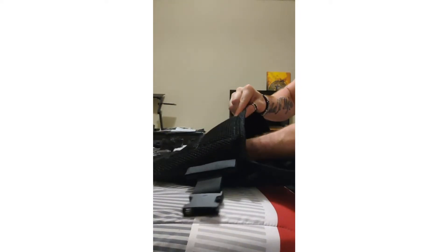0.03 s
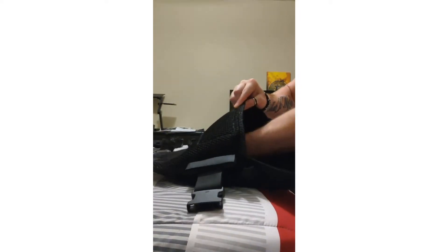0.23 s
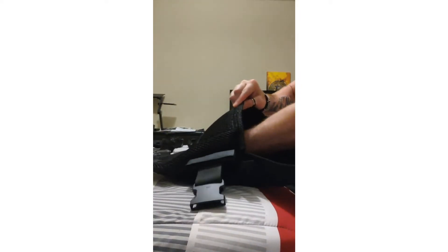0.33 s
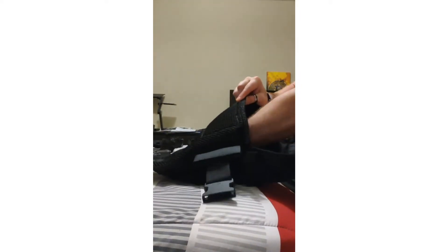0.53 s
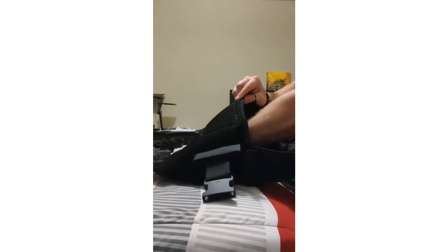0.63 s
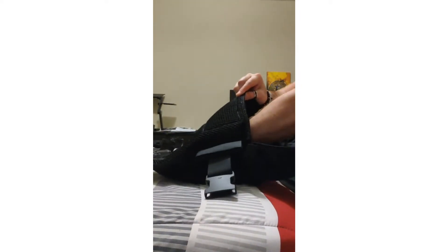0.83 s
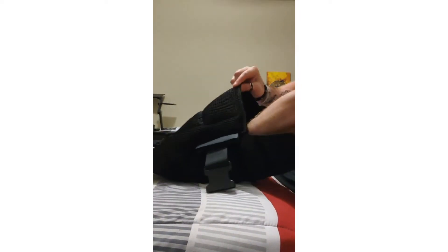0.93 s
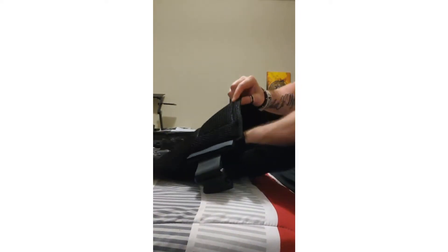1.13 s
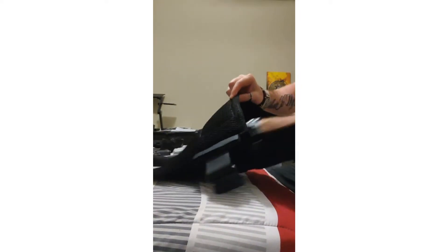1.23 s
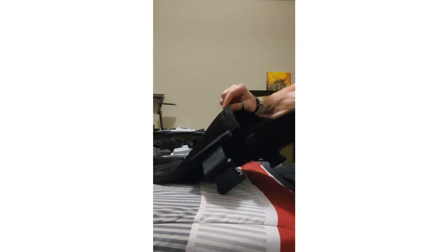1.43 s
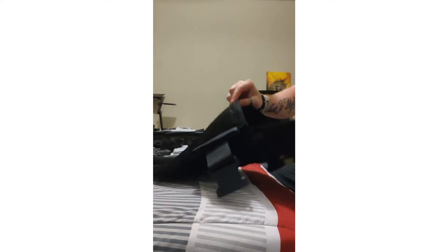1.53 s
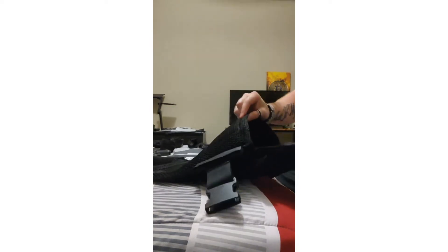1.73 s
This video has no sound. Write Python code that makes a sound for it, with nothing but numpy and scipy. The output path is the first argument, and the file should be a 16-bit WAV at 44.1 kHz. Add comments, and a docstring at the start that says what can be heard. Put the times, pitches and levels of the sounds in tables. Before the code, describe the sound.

Hook-and-loop fastener on a fabric bag is ripped open, close and dry indoors. Small pops at 0.05 and 0.15 s lead into a crackling rip from 0.2, strong at 0.35-0.5. A sharp jolt at 0.65 starts another loud tear until about 0.8; a third runs 0.97-1.17. After a lull, a weaker rip at 1.41, plastic buckle knocks near 1.53, then fading rustles over faint hum, rumble and hiss until 1.8.

```python
"""Hook-and-loop strap peeled open

A strap on a fabric bag is peeled in short pulls near a phone in a bedroom. Hooks snap free as filtered
random impulses; larger impulses jolt cloth and bag modes. Pops, rip jolts and a low thump are short
rings with ticks and rustling tails; a plastic buckle knocks near the end as rough contacts ringing
modes. Mains hum, low rumble, faint hiss.
"""
import sys
import numpy as np
from scipy import signal
from scipy.fft import rfft, irfft
from scipy.io import wavfile
from scipy.ndimage import uniform_filter1d

SR = 44100
rng = np.random.default_rng(int(sys.argv[2]) if len(sys.argv) > 2 else 0)


def dump(signal):
    """Clip the signal to [-1, 1] and save it as 16-bit WAV at the path in sys.argv[1]."""
    limited = np.clip(np.atleast_2d(signal).T, -1, 1)
    pcm = np.round(limited * 32767).astype(np.int16)
    wavfile.write(sys.argv[1], SR, pcm)


N = 79380

# peeling: t/s, hook level/dB, then re hooks: cloth jolts/dB, finest crackle/dB, duller rasp/dB, bag boom/dB
PEELING = [(0.0, -69, 11, -2, -6, 18), (0.034, -76, 17, -8, -1, 5), (0.064, -50, -7, -2, -2.5, -13),
           (0.134, -64.5, 6, -7, -2, 6), (0.16, -42.5, -13, 2, -7, -10.5), (0.174, -47.5, -17, -1, -11, -8),
           (0.194, -49.5, -7, 2, -3, -3), (0.204, -36, -19, -3, -7.5, -11), (.238, -39, -4, -0.5, -5.5, -3),
           (0.26, -35.5, -8.5, 1.5, -4.5, -9), (0.32, -32.5, -8, -4, -4.5, -5),
           (0.36, -26.5, -3, -2.5, -4.5, -9.5), (0.396, -29.5, 0, -0.5, 1, 0.5),
           (0.44, -25.5, -1.5, -3, -9, -10.5), (0.476, -32, -10, -7, -9, -8),
           (0.516, -41, -6.5, -5, -5, -8.5), (0.54, -45, -9, -8, -12, -5),
           (0.556, -41.5, -4.5, -2.5, -4.5, -9), (0.626, -40.5, -9.5, -1, -10.5, -9),
           (0.64, -40, 4, 1, 1, -9), (0.656, -26, -3, -2.5, -5.5, -3.5), (0.722, -24, -3, -7, -8, -10),
           (0.732, -25.5, -3, -0.5, -3, -5.5), (0.786, -33.5, -7, -6.5, -6, -12),
           (0.812, -32, 3, -3, -5, -5), (0.896, -41, -6.5, -4.5, -10, -9.5),
           (0.912, -43.5, -2, -1, -3.5, -16), (0.952, -47.5, -21, -10, -8.5, -10),
           (0.962, -42, -3, -6, -9, 3), (0.972, -30, -4.5, -13, -8, 0), (0.982, -34, -6, -1, -4.5, 0),
           (0.992, -26, -3, -9, -8, -8.5), (1.026, -31.5, -2.5, -3, -5, -1), (1.082, -25, -4.5, -8, -4, -4),
           (1.126, -39.5, -5, -2, -2, 2), (1.15, -37, -6.5, -6, 2, -8), (1.192, -46.5, -1, -4, 0, 0.5),
           (1.24, -53, -3.5, -2, -2, 1), (1.282, -59, 11, 2, -3, 11.5), (1.332, -57, 0, 1, 3, 9.5),
           (1.428, -35, 4, -3, -2.5, -5.5), (1.454, -35.5, -4.5, -0.5, -4.5, -0.5),
           (1.488, -42, -9, -3, 5, -2), (1.498, -45.5, -13, -3, -6, 3), (1.518, -44.5, -6, -4, 5, -2),
           (1.528, -45.5, 4, -4, -4, -2), (1.538, -48.5, -3, -1, 4, 4), (1.57, -46.5, -1, 0.5, 0, -3),
           (1.598, -43.5, -8.5, 1.5, -3.5, 0), (1.654, -50, -5.5, 3.5, -2, -7.5),
           (1.8, -58, -3.5, 2, 2.5, -3)]


def undb(db):
    """Amplitude ratio of a level in dB."""
    return 10 ** (np.asarray(db) / 20)


def unit(x):
    """Scale to rms 1."""
    return x / np.sqrt(np.mean(x ** 2))


def colour(x, table):
    """Minimum-phase filter through (f/Hz, gain/dB) points."""
    hz, db = np.array(table, float).T
    f = np.maximum(np.arange(4097) * SR / 8192, 5)
    octave = np.log2(f)
    lo, hi = np.log2(max(hz[0], 1)), np.log2(hz[-1])
    gain_db = np.interp(octave, np.log2(np.maximum(hz, 1)), db)
    # 24 dB/octave beyond the end points; flat if they lie below 16 Hz or above 11.6 kHz
    gain_db -= 24 * (lo > 4) * np.maximum(lo - octave, 0)
    gain_db -= 24 * (hi < 13.5) * np.maximum(octave - hi, 0)
    cepstrum = irfft(gain_db * np.log(10) / 20)
    fold = np.r_[1, 2 * np.ones(4095), 1, np.zeros(4095)]  # makes the cepstrum causal
    impulse = irfft(np.exp(rfft(cepstrum * fold)))
    return signal.fftconvolve(x, impulse)[:N]


def curve(table, axis):
    """Column of a table, interpolated over time."""
    rows = np.array(table, float)
    return np.interp(np.arange(N) / SR, rows[:, 0], rows[:, axis])


def walk(rate):
    """Random levels, a new one every 1 / rate s, slewed between."""
    k = int(SR / rate)
    steps = np.repeat(rng.standard_normal(N // k + 1), k)[:N]
    return 0.69 * uniform_filter1d(steps, k)


def clicks(per_s, scatter_db):
    """Random impulses of either sign, most small, a few large; rms 1."""
    u = rng.random((3, N))
    size_db = scatter_db * np.minimum(-np.log(u[2] + 1e-9), 3.5)
    impulses = (u[0] < per_s / SR) * np.sign(u[1] - .5) * undb(size_db)
    return unit(impulses / np.sqrt(per_s))


def tail(t60_s):
    """Exponentially decaying noise, energy 1."""
    t = np.arange(SR // 2) / SR
    h = rng.standard_normal(len(t)) * 1000. ** (-t / t60_s)
    return h / np.sqrt(np.sum(h ** 2))


def modes(table):
    """Impulse response of damped modes of alternating sign, energy 1."""
    t = np.arange(SR // 5) / SR
    ring = sum((-1) ** k * undb(db) * np.sin(2 * np.pi * hz * t) * 1000. ** (-t / t60)
               for k, (hz, db, t60) in enumerate(table))
    return ring / np.sqrt(np.sum(ring ** 2))


def peel_db():
    """Peel level: the strap holds under tension, hushed, then gives at once."""
    # t of give/s, hush just before/dB, hush length/s
    gives = [(0.145, 21, 0.026), (0.204, 14, 0.0094), (0.645, 7, 0.0093), (0.968, 20, 0.01),
             (1.411, 8, 0.015)]
    t = np.arange(N) / SR
    hush_db = sum(db * (t < s) * np.clip(1 - (s - t) / lead, 0, 1) for s, db, lead in gives)
    return curve(PEELING, axis=1) - hush_db


def peel(clumps):
    """Hooks snap at a rate that follows peel level; larger jolts ring cloth and bag."""
    # hook snap: f/Hz, gain/dB
    hook_tone = [(2200, -17), (2800, -9), (3600, -4.5), (4200, 0), (4650, 1.5), (5100, 4.5), (5700, -3.5),
                 (6500, -1), (7700, -5.5), (8400, -17.5)]
    # duller rasp: f/Hz, gain/dB
    rasp_tone = [(700, -11.5), (1000, 0.5), (1500, -1.5), (2300, -3.5), (3000, -8)]
    # finest crackle: f/Hz, gain/dB
    fine_tone = [(6000, -12), (8500, -7.5), (12000, -9.5), (15500, -9)]
    # cloth resonances: f/Hz, level/dB, t60/s
    cloth_modes = [(475, -4.5, 0.037), (594.5, 1.5, 0.053), (722, 2.5, 0.038), (837, 2.5, 0.025),
                   (1144, -2.5, 0.011)]
    # deeper bag panels: f/Hz, level/dB, t60/s
    bag_modes = [(97, -7, 0.056), (157.3, -1, 0.06), (241, -5, 0.048), (309.6, 0, 0.064),
                 (422.5, -3.5, 0.053)]
    clump_db = 1
    hooks_per_s, hook_scatter_db = 6000, 1.5  # rate at full rip
    jolts_per_s, jolt_scatter_db = 800, 2.5
    full_rip_db, thinning = -29, .4  # slower peel frees fewer hooks: dB of rate per dB of level
    pitch_spread, shifts_per_s = 0.054, 14  # looser / tighter hooks: +- fraction of pitch, in turns

    base_db = peel_db() + clump_db * clumps
    pace = np.clip(undb(thinning * (base_db - full_rip_db)), .25, 1.5)
    snaps = clicks(hooks_per_s * pace, hook_scatter_db)
    jolts = clicks(jolts_per_s, jolt_scatter_db) * undb(base_db)
    cloth = sum(signal.fftconvolve(jolts * undb(curve(PEELING, axis=k)), modes(m))[:N]
                for k, m in ((2, cloth_modes), (5, bag_modes)))
    tight = rng.random(N) < .5 + .5 * walk(shifts_per_s)
    hooks = sum(colour(snaps * (tight == (k > 0)), np.array(hook_tone) * [1 + k * pitch_spread, 1])
                for k in (-1, 1))
    rasp = unit(colour(snaps, rasp_tone)) * undb(base_db + curve(PEELING, axis=4))
    crackle = unit(colour(snaps, fine_tone)) * undb(base_db + curve(PEELING, axis=3))
    return unit(hooks) * undb(base_db) + cloth + rasp + crackle


def pops_and_jolts():
    """Single pops, jolts and a low thump: a tick, a short ring and a rustling tail."""
    # pops, rip jolts, low thump, before tone filters: t/s, level/dB, ring f/Hz, tick re ring/dB
    pop_table = [(0.039, -27.5, 1910, -19.5), (0.053, -19.5, 2060, 4), (.147, -27, 2170, 3),
                 (0.158, -17.5, 2030, 5.5), (0.163, -42, 2000, -3), (.204, -18.5, 1090, 8.5),
                 (0.219, -19.5, 1190, 8), (0.2356, -22, 1110, 15.5), (.247, -16, 630, 2),
                 (.212, -32, 1100, 10), (0.2698, -18.5, 685, 2), (.281, -34, 710, 11),
                 (.2898, -24, 810, 13.5), (0.297, -17, 637, -9), (.321, -23, 795, 11),
                 (0.421, -11.5, 550, 12.5), (0.5522, -29, 764, -1), (.557, -27.5, 744, -2),
                 (.565, -30, 700, -4), (0.581, -33, 750, 2), (.598, -28, 800, 3), (.611, -31, 750, -3),
                 (0.633, -36, 900, 11), (0.636, -26, 780, -2), (.647, -12, 724, -1.5), (.657, -6.5, 616, 3),
                 (0.678, -19, 630, 2), (0.698, -24.5, 694, -9), (.706, -10, 690, -16),
                 (.720, -12.5, 720, 10), (.807, -16, 710, 8), (.878, -29, 790, -3), (.907, -20, 1040, 12),
                 (.962, -28, 910, 8), (0.969, -24, 920, -5), (.991, -16, 665, -5), (1.080, -22, 457, -3),
                 (1.0962, -10.5, 1070, 4), (1.107, -19, 750, 19.5), (1.1167, -19, 910, 13),
                 (1.1239, -11.5, 1590, 6), (1.1443, -9, 1070, 5.5), (1.1451, -11, 1360, -13),
                 (1.1503, -15.5, 1110, 8), (1.2205, -28, 890, -5), (1.253, -41, 600, -8),
                 (1.263, -31.5, 730, -8), (1.2721, -34, 400, -8), (1.287, -29, 630, -4),
                 (1.315, -29, 1310, 0), (1.3598, -26, 750, 10), (1.377, -24, 603, -9),
                 (1.413, -18.5, 724, 4), (1.427, -20, 780, -7), (1.476, -22.5, 407, 2),
                 (1.585, -26.5, 310, 6), (1.597, -31, 330, -6), (1.655, -28.5, 1100, 3),
                 (1.688, -29, 1330, 11)]
    # tick and rustle: f/Hz, gain/dB
    tick_tone = [(400, -9), (2000, -2.5), (8000, -9), (15500, -12)]
    ring_cycles = 0.85  # decay constant
    tick_hz, tick_s, rustle_db, rustle_s = 3130, 0.0001, -16, 0.0015  # _s: decay constants
    out, t = np.zeros((2, N + 2048)), np.arange(2048) / SR
    for s, db, hz, tick_db in pop_table:
        ring = -np.sin(2 * np.pi * hz * t + 1) * np.exp(-t * hz / ring_cycles)
        rustle = undb(rustle_db) * rng.standard_normal(2048) * np.exp(-t / rustle_s)
        tick = rustle - np.cos(2 * np.pi * tick_hz * t) * np.exp(-t / tick_s)
        i = int(s * SR)
        out[:, i:i + 2048] += undb(db) * np.array([ring, undb(tick_db) * tick])
    rings = colour(out[0, :N], [(250, 1), (1000, -1.5), (5000, -10.5)])
    return rings + colour(out[1, :N], tick_tone)


def buckle():
    """Plastic buckle: short rough contacts on the cloth ring its modes."""
    # contacts: t/s, drive level/dB, decay constant/s
    knocks = [(1.482, -37, 0.0035), (1.492, -31, 0.0035), (1.503, -33, 0.0038), (1.5273, -18, 0.00021),
              (1.537, -24.5, 0.00046)]
    # buckle: f/Hz, level/dB, t60/s
    buckle_modes = [(1480, 3, 0.016), (1744, -4.5, 0.014), (3105, 0, 0.017), (3700, 0.5, 0.015)]
    push = 1.24  # steady push re rms of the scrape noise
    t = np.arange(N) / SR
    touch = sum(undb(db) * (t >= s) * np.exp(-np.maximum(t - s, 0) / length) for s, db, length in knocks)
    force = touch * (push + rng.standard_normal(N))
    return signal.fftconvolve(force, modes(buckle_modes))[:N]


def background():
    """Mains hum of drifting level and phase, plus rumble and hiss from filtered noise."""
    # rumble: t/s, level/dB
    rumble_level = [(0.0, -42), (0.134, -50), (0.224, -42.5), (0.31, -38), (0.4, -30), (0.546, -46.5),
                    (0.7, -35.5), (0.782, -43), (0.966, -44.5), (1.112, -37.5), (1.192, -42), (1.548, -42),
                    (1.574, -40), (1.614, -42), (1.758, -40.5), (1.8, -51)]
    # rumble: f/Hz, gain/dB
    rumble_tone = [(12, -1), (22, 8), (40, -4), (60, -10), (90, -8), (170, -28)]
    # hiss: f/Hz, gain/dB
    hiss_tone = [(130, -1.5), (600, -1), (900, -13.5), (5000, -13), (9000, -21), (15500, -16.5)]
    hum_hz, hum_db, drifts_per_s, hiss_db = 121.6, -52.5, 8.7, -52.5
    drift = walk(drifts_per_s) + 1j * walk(drifts_per_s)
    carrier = np.exp(2j * np.pi * hum_hz * np.arange(N) / SR)
    hum = unit(np.real((2 + drift) * carrier)) * undb(hum_db)
    rumble = unit(colour(rng.standard_normal(N), rumble_tone)) * undb(curve(rumble_level, axis=1))
    hiss = unit(colour(rng.standard_normal(N), hiss_tone)) * undb(hiss_db)
    return hum + rumble + hiss


def scene():
    """Mix mid and side with room decay and background, then form left and right."""
    # difference between the two microphone ports: f/Hz, side gain/dB
    side_tone = [(15, -9), (45, -18), (85, -17), (140, -25), (300, -9.5), (600, -11), (1300, -1),
                 (2400, -2.5), (4500, -0.5), (7500, -5.5), (10000, -17), (17000, -25)]
    # port balance: f/Hz, left re right/dB
    left_tone = [(15, -1.5), (200, 3.5), (700, 2), (2800, 4.5), (5600, 0.5), (9000, -1), (17000, 0.5)]
    room_db, room_t60_s, knock_side_t60_s, clumps_per_s = -8, 0.041, 0.027, 150
    clumps = walk(clumps_per_s)
    knocks_and_pops = pops_and_jolts() + buckle()
    # wide, close strap: the ports differ by other hooks of the same clumps
    mid_dry = peel(clumps) + knocks_and_pops
    side_dry = peel(clumps) + signal.fftconvolve(knocks_and_pops, tail(knock_side_t60_s))[:N]
    mid, side = (d + undb(room_db) * signal.fftconvolve(d, tail(room_t60_s))[:N] + background()
                 for d in (mid_dry, side_dry))
    side = colour(side, side_tone)
    lean = np.array(left_tone, float)
    left = colour(mid + side, lean * [1, .5])
    right = colour(mid - side, lean * [1, -.5])
    return np.array([left, right])


def record(dry):
    """The phone cuts the top steeply: elliptic low-pass."""
    top_hz = 15750
    return signal.sosfilt(signal.ellip(14, .3, 90, top_hz, fs=SR, output="sos"), dry)


dry = scene()
out = record(dry)
dump(out)
```